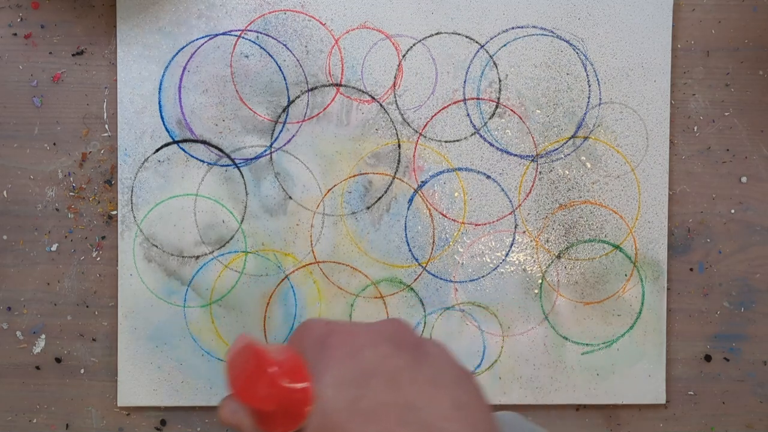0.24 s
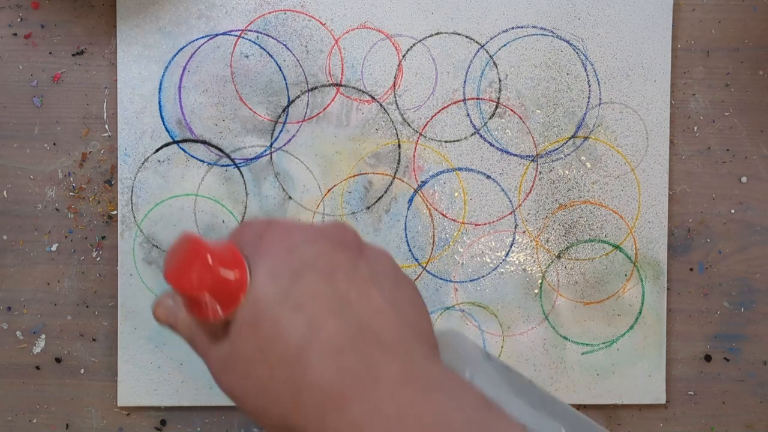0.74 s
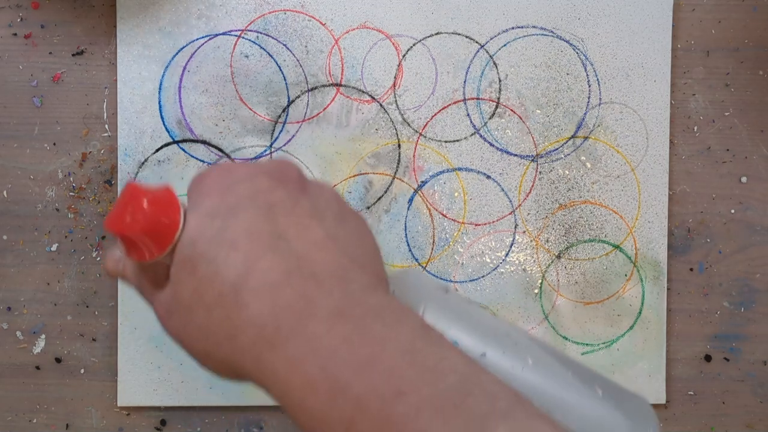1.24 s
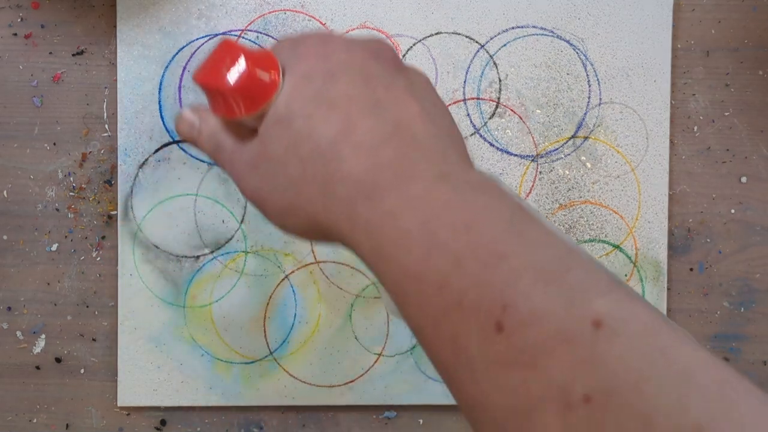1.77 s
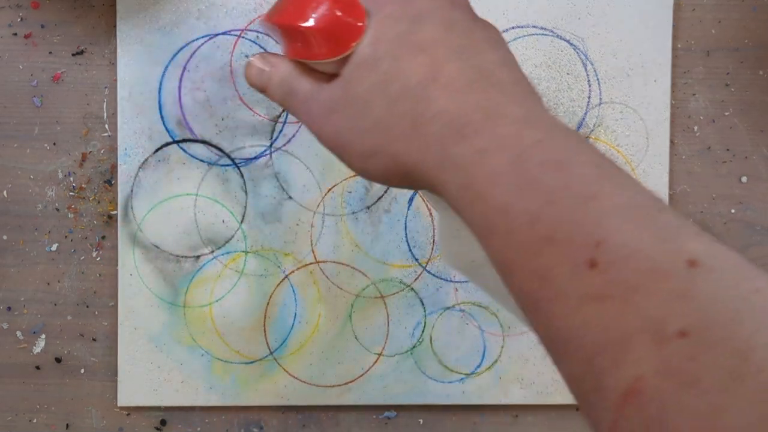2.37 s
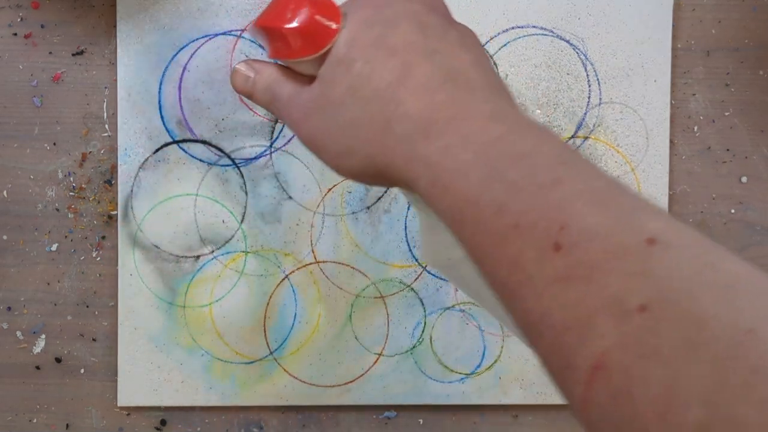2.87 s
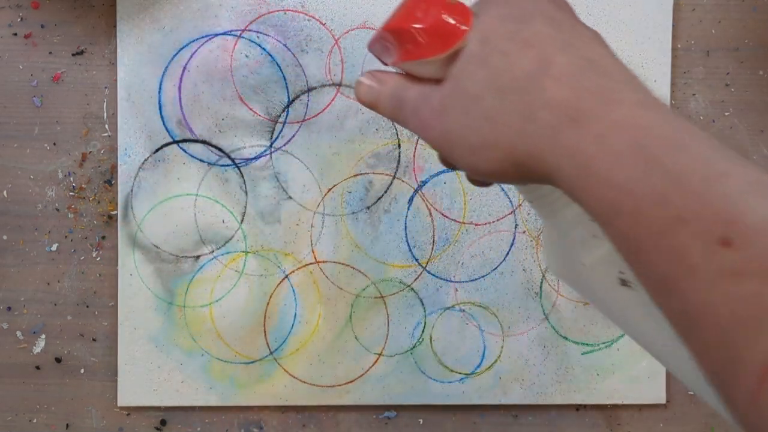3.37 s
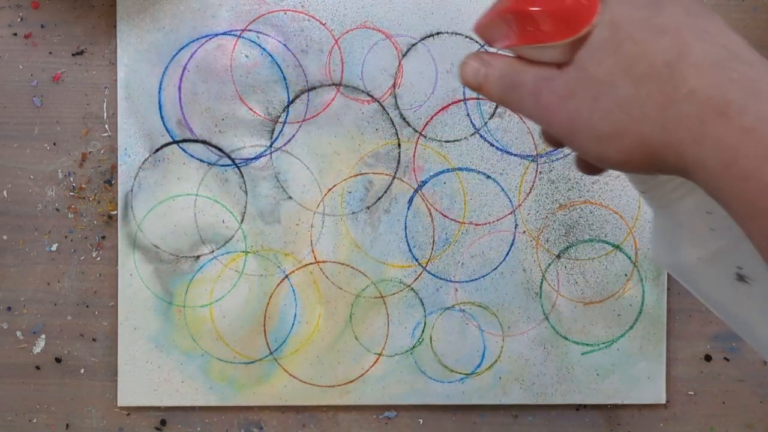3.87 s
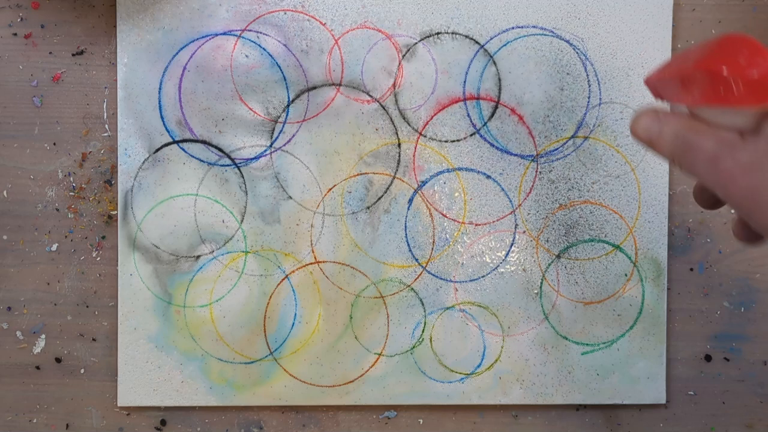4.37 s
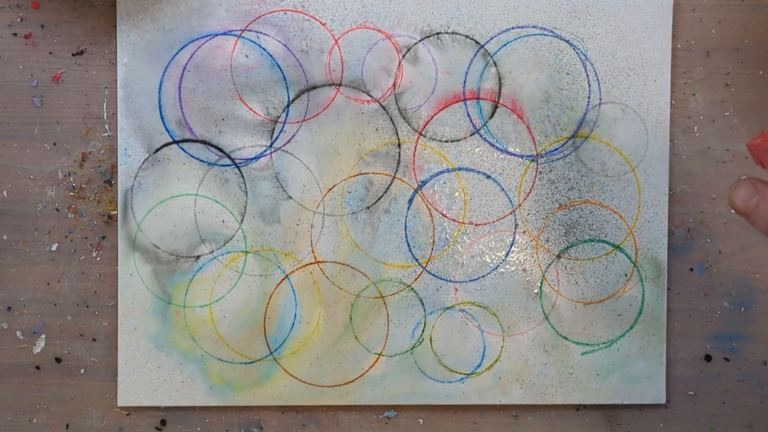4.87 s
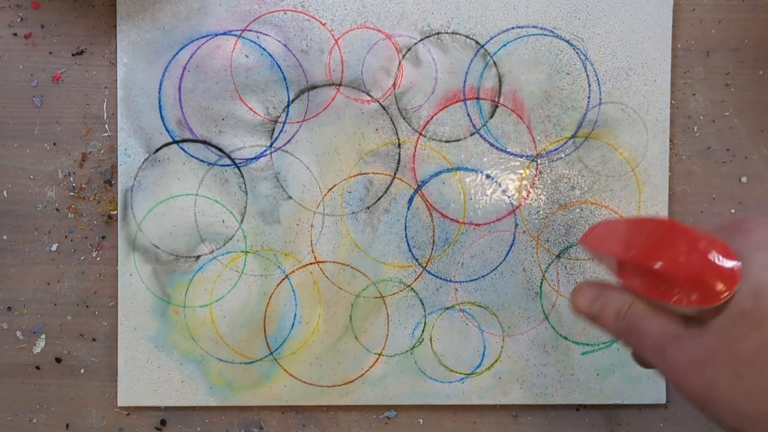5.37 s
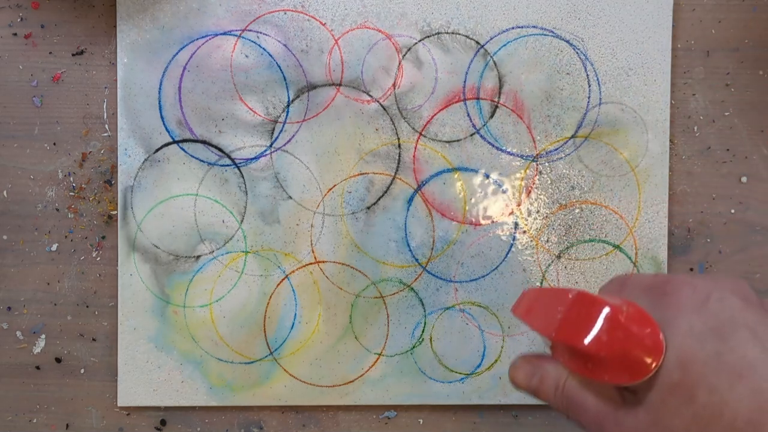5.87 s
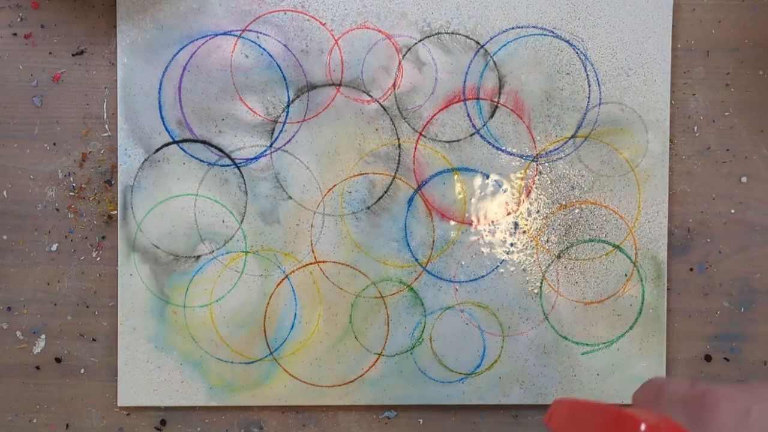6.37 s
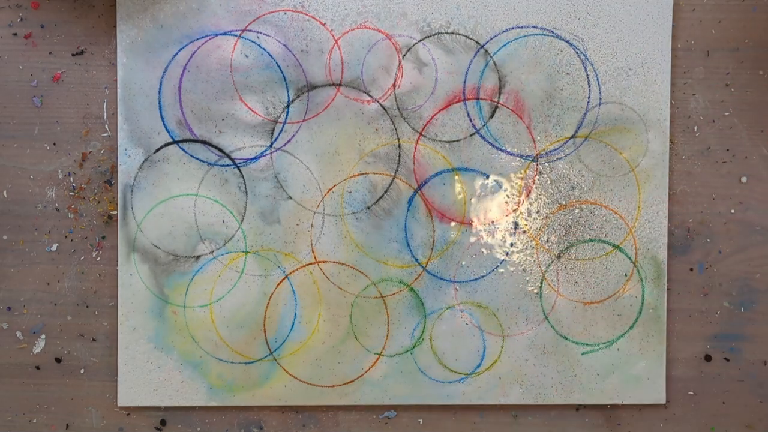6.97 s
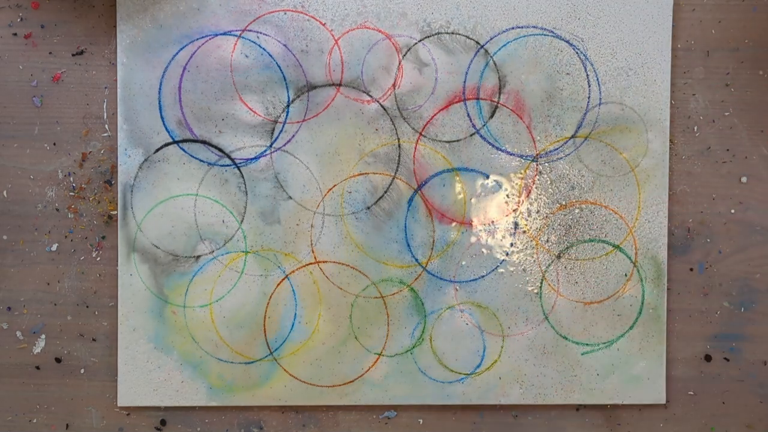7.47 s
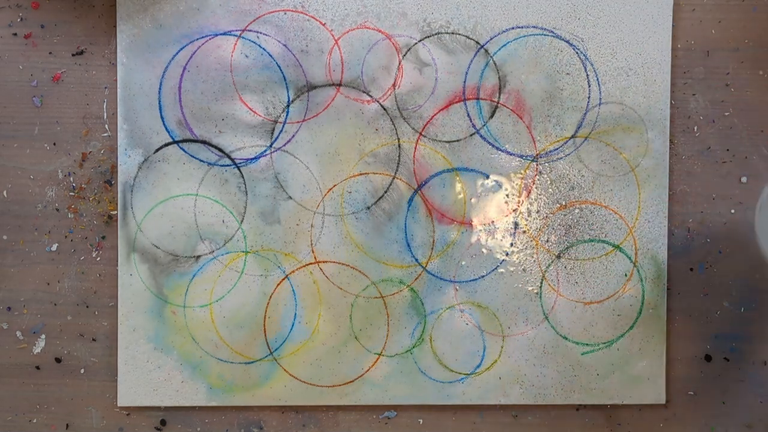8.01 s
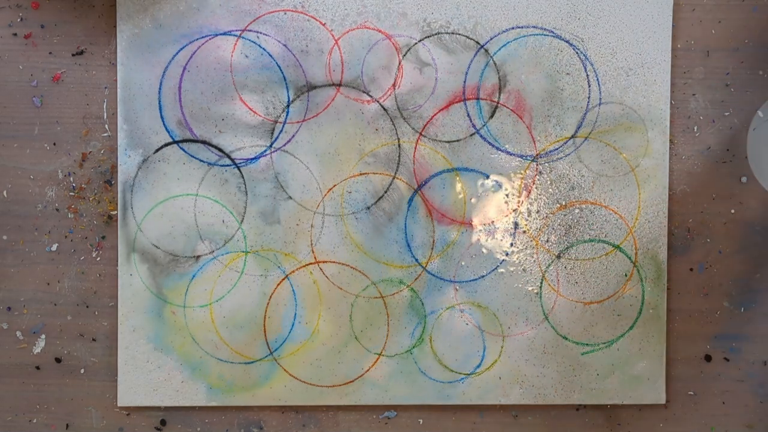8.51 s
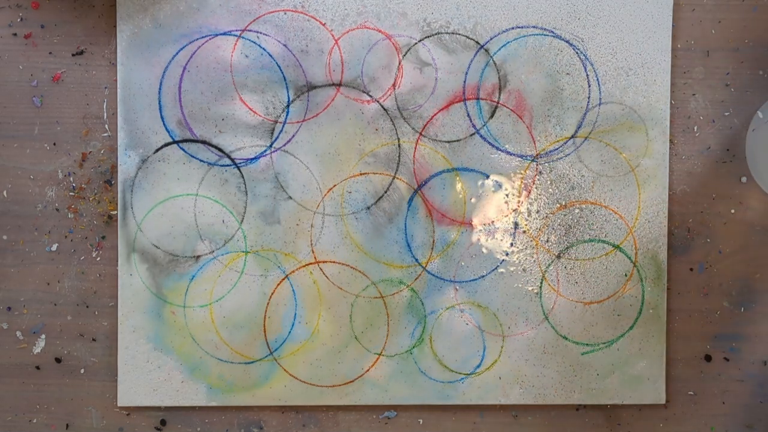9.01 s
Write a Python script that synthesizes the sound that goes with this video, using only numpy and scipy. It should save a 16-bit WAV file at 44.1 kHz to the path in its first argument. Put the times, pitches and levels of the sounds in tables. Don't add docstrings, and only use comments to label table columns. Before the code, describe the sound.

A quiet room holds a soft low hum and very faint high electronic whine, heard closely in stereo. A spray is already under way at 0 s; further squirts come at about 0.4, 1.15, 1.55, 2.05, 2.8, 3.4, 3.8, 4.25, 4.85, 5.3, 5.8 and 6.3 s. Each is a wide, bright hiss of roughly a fifth of a second, swelling and cutting off, with droplets making the board hum near 900 Hz. The 2.05 s squirt is strongest, with crackling spits. Light plastic ticks and hollow knocks sit between; from 5.15 to 6.6 s the trigger snaps back sharply, with high spring rings near 5.2 and 6.6 s. Small ticks follow near 7.1 s. A sleeve brushes with a bright rasp at 7.5 s, fading softly by 8.2. At 8.55 s the bottle lands with a deep, soft thump, then rumbles and scrapes briefly to the end.

```python
import sys
import numpy as np
from scipy import signal
from scipy.fft import rfft, irfft, next_fast_len
from scipy.io import wavfile
from scipy.ndimage import uniform_filter1d

SR = 44100
rng = np.random.default_rng(int(sys.argv[2]) if len(sys.argv) > 2 else 0)


def master(y):
    cut = np.clip(np.atleast_2d(y).T, -1, 1)
    pcm = np.round(cut * 32767)
    wavfile.write(sys.argv[1], SR, pcm.astype(np.int16))


def level_to_linear(level):
    exponent = np.asarray(level, float) / 20
    return 10 ** exponent


N = 407917
T = np.arange(N) / SR


def level(x, db):
    return x * level_to_linear(db) / np.sqrt(np.mean(x ** 2))


def on_log(table, hz):
    rows = np.array(table, float)
    return np.interp(np.log(hz + 1), np.log(rows[:, 0]), rows[:, 1])


def shape(x, gain):
    size = next_fast_len(N)
    hz = np.arange(size // 2 + 1) * SR / size
    return irfft(rfft(x, size) * gain(hz), size)[..., :N]


def ring(x, hz, width_hz):
    return signal.lfilter(*signal.iirpeak(hz, hz / width_hz, SR), x)


def walk(rate):
    k = int(SR / rate)
    held = np.repeat(rng.standard_normal(N // k + 1), k)
    return 1.44 * uniform_filter1d(uniform_filter1d(held, k), k)[:N]


def pair(alike):
    common, own = rng.standard_normal(N), rng.standard_normal((2, N))
    return np.sqrt(alike) * common + np.sqrt(1 - alike) * own


def sides(pan_db):
    return level_to_linear(np.array([pan_db, -pan_db]) / 2)


def fading(s, t60, attack_s):
    t = np.maximum(T - s, 0)
    return (1 - np.exp(-t / attack_s)) * 1000. ** (-t / t60)


SAG_DB = 11

# valve opens [t/s], pressure peaks after [t/s], stroke ends after [t/s],
# loudest mist [level/dB], climb from first jet to peak [level/dB]
SQUEEZES = [(-0.12, 0.11, 0.19, -42, 4), (0.385, 0.084, .17, -39.5, 6), (1.15, 0.076, 0.17, -44.5, 4.5),
            (1.549, .09, 0.2, -44, 2.5), (2.054, 0.12, 0.15, -32.5, 15.5), (2.77, 0.14, 0.21, -38, 5),
            (3.385, 0.07, 0.18, -42, 0), (3.818, 0.077, .17, -40, 0.5), (4.26, 0.084, .21, -39.5, 3.5),
            (4.85, 0.068, 0.22, -39, 2.5), (5.334, 0.062, .21, -36.5, 8.5),
            (5.818, 0.077, 0.18, -39.5, 3.5), (6.3, .065, 0.17, -37, 6.5)]


def stroke():
    open_db_per_s, sag_curve, shut_db_per_s = 750, 1.63, 260
    peak_db, pressure_db, age = np.zeros(N), np.full(N, -90.), np.zeros(N)
    for s, peak_s, end_s, db, climb_db in SQUEEZES:
        now = (T >= s) & (T < s + .4)
        t = T[now] - s
        rise = np.minimum(open_db_per_s * t - 20.5 - climb_db, climb_db * (t / peak_s - 1))
        sag = SAG_DB * np.clip((t - peak_s) / (end_s - peak_s), 0, 1) ** sag_curve
        fall = -sag - shut_db_per_s * np.maximum(t - end_s, 0)
        peak_db[now], age[now] = db, t
        pressure_db[now] = np.where(t < peak_s, rise, fall)
    return peak_db, pressure_db, age


# [f/Hz], power per Hz [level/dB]
MIST = [(59, -44), (100, -13.5), (328, -25), (424, -18.5), (721, -19.5), (910, -7.5), (1200, -8),
        (2000, -5.5), (2270, -6), (8640, -8.5), (14700, -14.5), (16000, -33.5)]


def mist(peak_db, pressure_db, age):
    fine_db, fine_follows = -3, 0.24
    pan_db_at_start, pan_db_per_s = 7.5, -16
    port_lag_s = 9e-5
    flow = level_to_linear(peak_db + pressure_db) * (pressure_db > -90)
    brightness_db = fine_db + fine_follows * np.maximum(pressure_db, -40)
    brightness_db += .3 * np.clip(pressure_db + SAG_DB, -25, 0)
    pan_db = pan_db_at_start + pan_db_per_s * age + 1.6 * walk(20)
    drops = pair(0.059) * level_to_linear(2.0 * rng.exponential(size=N) + 1.23 * walk(120))
    hiss = level(shape(drops, lambda hz: level_to_linear(on_log(MIST, np.minimum(hz, 14500)))), 1.67)
    fine = shape(hiss, lambda hz: 1 / (1 + (9500 / (hz + 1)) ** 8))
    hiss = hiss + fine * (level_to_linear(brightness_db + 2) - 1)
    hiss[1] = np.roll(hiss[1], int(port_lag_s * SR))
    return hiss * flow * sides(pan_db)


STRUCK_SPOT_DB = [1, 1.5, -5.5, 1, -1, -0.5, 2.5, -0.5, -1, -4.5, 4.5, 6, 2.5]


def board_hum(pressure_db):
    board_hz, board_width_hz = 917, 27.4
    hum_db, follows, lag_s, waver_db = -49.5, .9, 0.0096, 2
    spot_db = np.array(STRUCK_SPOT_DB)[np.searchsorted(np.transpose(SQUEEZES)[0], T) - 1]
    step = 1 / (lag_s * SR)
    landing = signal.lfilter([step], [1, step - 1], np.maximum(pressure_db, -45) + 45) - 44.5
    gain = level_to_linear(hum_db + spot_db + follows * landing + waver_db * walk(45))
    gain = gain * np.clip(landing / 10 + 4.4, 0, 1)
    mode = level(ring(ring(pair(1.0), board_hz, board_width_hz), board_hz, 180), -2.86)
    upper_mode = level(ring(pair(0.56), 1105, 200), -8.5)
    return (mode + upper_mode) * gain * sides(0.68)[:, None]


# [f/Hz], power per Hz [level/dB]
ROOM = [(30, -46), (48, -13), (98, -16), (163, -24.5), (258, -29.5), (400, -36), (684, -35.5), (950, -29),
        (1170, -25), (1900, -26.5), (6500, -33), (8300, -26.5), (10500, -39.5), (16000, -49)]
# [f/Hz], likeness [0-1]
ROOM_ALIKE = [(60, 0.91), (130, 0.7), (290, 0.13), (640, 0), (1410, 0), (3100, -0.0), (6820, 0),
              (15000, 0.0)]
# [f/Hz], [level/dB]
WHINE = [(7639, -69), (8357, -74.5), (9049, -81), (9189, -88.5), (13577, -97)]


def room():
    room_db, stir_db, stir_db_per_s = -59.5, .8, .45

    def alike(hz):
        return np.clip(on_log(ROOM_ALIKE, hz), 0, 1)

    def is_bass(hz):
        return 1 / (1 + (hz / 150) ** 4)

    mid = shape(rng.standard_normal(N), lambda hz: level_to_linear(on_log(ROOM, hz)) * np.sqrt(1 + alike(hz)))
    side = shape(rng.standard_normal(N), lambda hz: level_to_linear(on_log(ROOM, hz)) * np.sqrt(1 - alike(hz)))
    air = level(np.array([mid + side, mid - side]), room_db - 2.0)
    bass = shape(air, is_bass) + level(ring(rng.standard_normal(N), 96.7, 7.7), -67.5)
    upper = shape(air, lambda hz: 1 - is_bass(hz))
    out = bass * level_to_linear(stir_db * walk(2.94) + stir_db_per_s * (T - T.mean())) + upper * level_to_linear(-1.5)
    right_lead = np.array([[0], [.7]])
    for k, (hz, db) in enumerate(WHINE):
        gain = level_to_linear(db + 3.5 + 0.66 * k + .5 * walk(22))
        out = out + gain * np.sin(2 * np.pi * hz * T + .15 * walk(12) + right_lead)
    return out


# [f/Hz], width [f/Hz], [level/dB]
PLASTIC = [(2620, 33, -5.5), (3420, 59, -30), (4600, 270, -36), (4600, 31, -29), (6340, 65, -19),
           (6900, 210, -4), (8160, 370, 0)]
TICK_HZ = [90, 250, 550, 1000, 2300, 4500, 6100, 8000, 12000, 16000]


def clicks(table, bass_db, treble_db, bass_pan_db, treble_pan_db, ring_db):
    t = np.arange(8192) / SR
    hz = np.arange(4097) * SR / 8192
    out = np.zeros((2, N + len(t)))
    mode_hz, width_hz, mode_db = np.transpose(PLASTIC)[:, :, None]
    apart = hz / (hz + 1500)
    pan = sides(bass_pan_db + (treble_pan_db - bass_pan_db) * hz / (hz + 4000))
    for s, db, mid_db, rattle_db in table:
        low_db = bass_db + 0.38 * mid_db
        high_db = treble_db + 0.2 * mid_db
        noise, luck = rng.standard_normal((4, len(t))), rng.standard_normal((3, len(PLASTIC), 1))
        ragged = level_to_linear(15 * uniform_filter1d(noise[3], size=32))
        sharpness = np.clip((db + 58) / 26, .3, 1.4)
        crack = sharpness * (t / .0015) ** 2 * np.exp(2 - 2 * t / .0015)
        shake = crack + .5 * np.exp(-t / 0.0038) + level_to_linear(rattle_db) * np.exp(-t / 0.029)
        burst = rfft(noise[:3] * ragged * shake * (1 - np.exp(-t / 0.0016)))
        modes = level_to_linear(mode_db + 4.3 * luck[0]) * np.exp(-np.pi * 1.5 * width_hz * t)
        modes = modes * np.sin(2 * np.pi * mode_hz * (1 + 0.033 * luck[1]) * t)
        ringing = rfft(modes.sum(axis=0) * (1 - np.exp(-t / 0.0002)))
        wave = burst[0] + 1.52 * apart * burst[1:] + level_to_linear(ring_db) * ringing
        colour = db + np.array([low_db + 3.5, low_db + 6.0, low_db + 3.5, low_db + 12.5, mid_db + 6.5, 4.5,
                                high_db / 2 - 0.5, high_db + 6.0, high_db - 12.5, high_db - 14.5])
        i = int(s * SR)
        out[:, i:i + len(t)] += irfft(wave * pan * level_to_linear(on_log(np.transpose([TICK_HZ, colour]), hz)))
    return out[:, :N]


def pings(table, pan_db, spread):
    out = np.zeros((2, N + 8192))
    t = np.arange(8192) / SR
    for s, db, hz, t60 in table:
        noise = rng.standard_normal((3, len(t)))
        push = (noise[0] + 1.65 * noise[1:]) * (1000. ** (-t / t60) + 2.0 * np.exp(-t / 0.00076))
        tone = ring(ring(push, hz, spread * hz), hz, 2 * spread * hz)
        tone = tone / np.abs(tone.mean(axis=0)).max()
        i = int(s * SR)
        out[:, i:i + len(t)] += level_to_linear(db - 5.5) * tone * sides(pan_db)[:, None]
    return out[:, :N]


# [t/s], peak [level/dB], [f/Hz], T60 [t/s]
VALVE = [
    (0.077, -39, 5430, 0.042),
    (1.1109, -55, 5240, 0.05),
]


def valve_ball():
    return pings(VALVE, pan_db=-4, spread=0.061)


# [t/s], 3.5-6 kHz peak [level/dB], hollowness [level/dB], rattle after crack [level/dB]
SPITS = [(0.0772, -42.5, -30, -27), (0.4154, -51, -16, -16), (0.5694, -46, 4, -34), (1.292, -41.5, -9, -13),
         (1.7205, -52, 7, -14), (2.1355, -33.5, -7, -14), (2.1514, -32, -6, -8), (2.7931, -39, -6, -6),
         (2.9906, -46, 1, -16), (3.4096, -41.5, 5, -20), (3.8457, -49, -3, -20), (5.5648, -47, 5, -21),
         (5.8326, -43, 2, -13), (6.0192, -48.5, 3, -16)]


def spits():
    return clicks(SPITS, -15, -4, bass_pan_db=8.0, treble_pan_db=15, ring_db=-32)


# [t/s], peak [level/dB], [f/Hz], T60 [t/s]
PINGS = [(0.1281, -50, 2170, 0.04), (0.2772, -50, 1070, 0.043), (0.3674, -35.5, 1510, 0.06),
         (0.681, -45, 980, 0.071), (1.1104, -32.5, 2900, 0.063), (1.511, -45, 2800, 0.047),
         (1.8533, -32.5, 1480, 0.044), (2.0627, -35.5, 1950, 0.049), (2.3121, -44, 2820, 0.11),
         (2.5604, -45.5, 1094, 0.095), (3.7878, -42.5, 930, 0.051), (4.2248, -44.5, 1910, 0.047),
         (5.1686, -38, 2470, 0.035), (5.651, -30, 2620, 0.024), (6.1123, -16, 1910, 0.016),
         (7.4467, -49, 1140, 0.048)]


def small_parts():
    return pings(PINGS, pan_db=-2.5, spread=0.24)


# [t/s], 3.5-6 kHz peak [level/dB], hollowness [level/dB], rattle after crack [level/dB]
TICKS = [(0.3666, -59, 10, -8), (0.6809, -65.5, 11, 2.5), (0.7028, -42, -3.5, -8),
         (1.4087, -44.5, -3.5, -5.5), (1.4716, -50, 5, -5.5), (1.8143, -63, 5, 7.5),
         (1.8537, -49.5, 8, -10.5), (1.8761, -37, -10, -13), (2.3734, -42.5, 1, -9.5),
         (2.5012, -51.5, -2, -11), (2.6005, -59, 6, -15), (3.0739, -56.5, 2, -4), (3.1497, -44, 3, -13.5),
         (3.7045, -51, 5, -12), (3.7883, -59, 17, -14), (4.068, -57, -2.5, -2.5), (4.14, -54, -3, -12),
         (4.2253, -57, 3, -18), (4.5506, -60, -1, 5), (4.6004, -48, 2.5, -4.5),
         (4.6184, -33.5, -11.5, -13.5), (7.0074, -58, 5, -10), (7.1332, -58, -1, -6),
         (7.1482, -48.5, -19, -14), (7.5048, -46, 4, -16), (7.5144, -47, 5, -12.5), (7.6094, -63, 4, -13),
         (8.5894, -64, 12, -4)]


def trigger_ticks():
    return clicks(TICKS, -4.5, -2, bass_pan_db=1.0, treble_pan_db=-2.0, ring_db=-9.0)


# [t/s], peak [level/dB], [f/Hz], T60 [t/s]
BODY = [
    (0.7035, -42, 1200, .06),
    (1.856, -41, 706, 0.089),
    (2.375, -49, 990, .05),
    (3.15, -50, 680, .05),
    (4.62, -48, 500, 0.077),
    (6.114, -37.5, 480, 0.093),
    (6.597, -29, 1200, .06),
]


def bottle_body():
    return pings(BODY, pan_db=7.0, spread=0.28)


# [t/s], peak [level/dB], [f/Hz], T60 [t/s]
SPRING = [
    (4.6184, -26.5, 4600, 0.036),
    (5.1993, -10.5, 8000, 0.078),
    (5.2114, -27, 4270, 0.057),
    (5.682, -34, 4500, 0.058),
    (6.161, -36, 4430, 0.045),
    (6.6023, -15, 7760, 0.045),
    (6.625, -21.5, 7800, 0.04),
]


def return_spring():
    return pings(SPRING, pan_db=-4, spread=0.061)


# [t/s], 3.5-6 kHz peak [level/dB], hollowness [level/dB], rattle after crack [level/dB]
SNAPS = [(5.1542, -49, -1, -7), (5.1701, -29, 8.5, -9), (5.1991, -25.5, -5.5, -12), (5.2114, -27, -18, -21),
         (5.6526, -23.5, 3.5, -10), (5.6815, -21, -18, -17), (5.6934, -33, -10, -11.5),
         (6.099, -51, -2, -6), (6.1125, -27.5, 5.5, -11), (6.1354, -39.5, 9, -16), (6.1599, -39, 0, -17),
         (6.5161, -49, 0, -18), (6.5828, -47, -2, -8), (6.595, -36, -2.5, 0), (6.6009, -32, -6, -9),
         (6.6243, -30.5, -6, -25)]


def trigger_snaps():
    return clicks(SNAPS, -5.5, -1.7, bass_pan_db=1.0, treble_pan_db=-5.5, ring_db=-8.0)


# [t/s], [level/dB], T60 [t/s]
CLOTH = [
    (7.505, -37.5, 0.14),
    (7.6, -61, .2),
    (7.735, -55, 0.38),
    (7.88, -59, 0.41),
    (8.07, -70, .3),
]


def sleeve():
    cloth = level(ring(pair(0.36), 1600, 500) + ring(pair(0.053), 3400, 6000), -1.0)
    return cloth * sum(level_to_linear(db) * fading(s, t60, attack_s=0.007) for s, db, t60 in CLOTH)


# [t/s], peak [level/dB], [f/Hz], T60 [t/s]
CAP = [
    (7.507, -36, 13900, 0.15),
]


def cap_rasp():
    return pings(CAP, pan_db=5.0, spread=0.25)


THUMP_S, RIM_S = 8.546, 8.575

# [f/Hz], [level/dB], T60 [t/s]
TABLE = [(149, -41, 0.038), (202, -33, 0.035), (263, -36, 0.045), (365, -40, 0.04), (485, -44, 0.059),
         (678, -47, 0.034)]


def thump():
    t = np.maximum(T - THUMP_S, 0)
    turns = 44 * t + 75 * 0.0288 * (1 - np.exp(-t / 0.021))
    swell = (t / 0.03) ** 1.26 * np.exp(1.5 - t / .017)
    boom = level_to_linear(-20.5) * swell * np.sin(2 * np.pi * (turns + 0.54))
    push = rng.standard_normal(N) * (t / 0.009) * np.exp(1 - t / 0.0083)
    push = push + rng.standard_normal(N) * level_to_linear(-14) * fading(RIM_S + .015, .3, .004)
    top = sum(level_to_linear(db + 25.5) * ring(ring(push, hz, 0.85 / t60), hz, hz / 2) for hz, db, t60 in TABLE)
    return boom + top * sides(3.1)[:, None]


def slide():
    rock_db, rock_t60_s, slide_db, slide_ends_s, rest_db = -40, .2, -52, 8.94, -65
    rim_db, rim_t60_s, scrape_db = -45.5, 0.31, -63
    sliding = np.clip((slide_ends_s - T) / .02, 0, 1)
    load = level_to_linear(rock_db) * fading(THUMP_S + .05, rock_t60_s, .003) + level_to_linear(slide_db) * sliding + level_to_linear(rest_db)
    settle = np.clip((T - THUMP_S - .07) / 0.029, 0, 1)
    rumble = level(ring(ring(rng.standard_normal(N), 73, 45), 75, 80), 0)
    rumble = rumble * load * level_to_linear(2.2 * walk(45) + 0.3) * settle
    buzz = level(ring(pair(0.84), 200, 130), -66.5) * (load / level_to_linear(slide_db)) ** 0.48 * settle
    rub = level_to_linear(rim_db) * fading(RIM_S, rim_t60_s, 0.0048) + level_to_linear(scrape_db + 1.7 * walk(12)) * settle
    scrape = ring(pair(0.11), 1260, 470) + 0.54 * ring(pair(0.29), 2100, 200)
    scrape = scrape + 0.16 * ring(pair(0.11), 7100, 5100)
    return rumble + buzz + level(scrape, -1.2) * rub


def scene():
    peak_db, pressure_db, age = stroke()
    spray = mist(peak_db, pressure_db, age) + board_hum(pressure_db) + spits()
    trigger = trigger_ticks() + trigger_snaps()
    rings = valve_ball() + small_parts() + bottle_body() + return_spring() + cap_rasp()
    return spray + room() + trigger + rings + sleeve() + thump() + slide()


def low_pass(x):
    return signal.sosfilt(signal.butter(12, 16810, fs=SR, output="sos"), x)


def record(dry):
    heard = shape(dry, lambda hz: 1 / (1 + (38 / (hz + 1)) ** 6) / (1 + (hz / 16050) ** 100))
    return low_pass(heard)


dry = scene()
out = record(dry)
master(out)
```